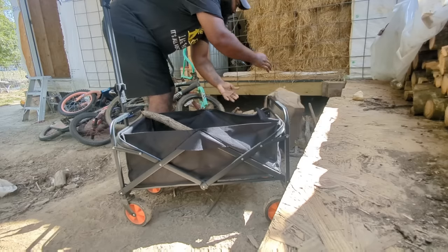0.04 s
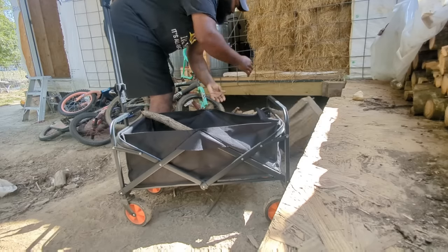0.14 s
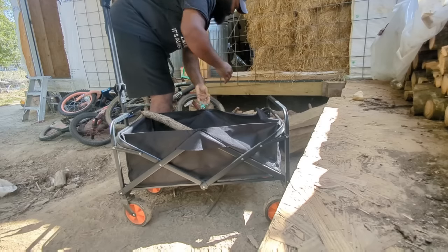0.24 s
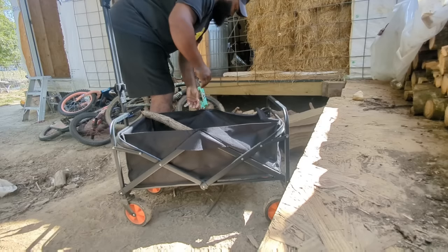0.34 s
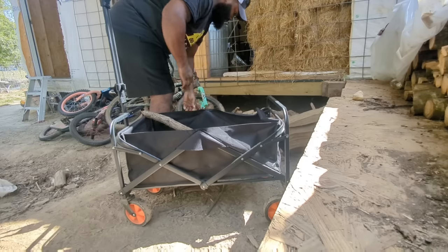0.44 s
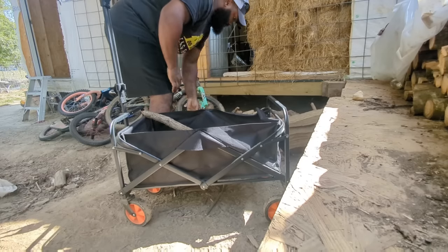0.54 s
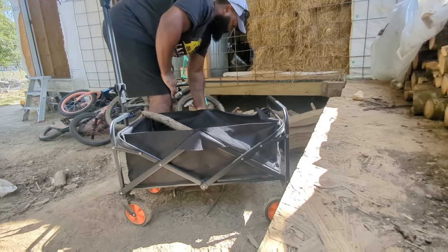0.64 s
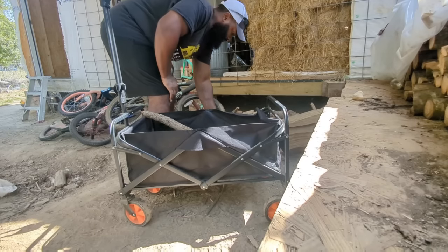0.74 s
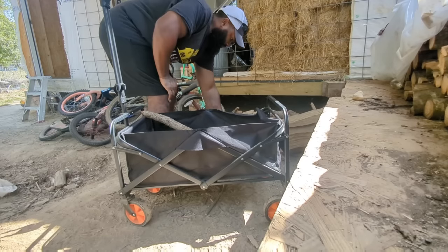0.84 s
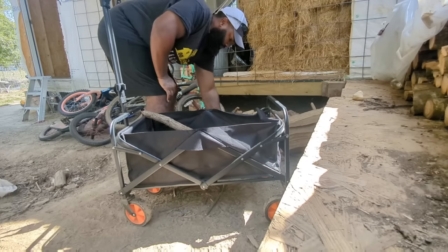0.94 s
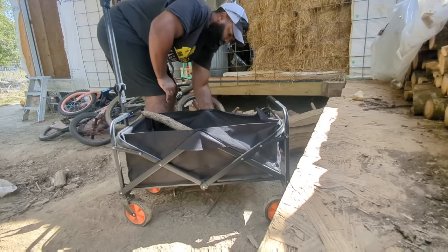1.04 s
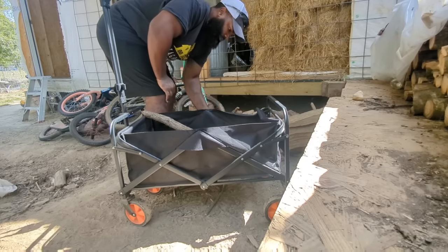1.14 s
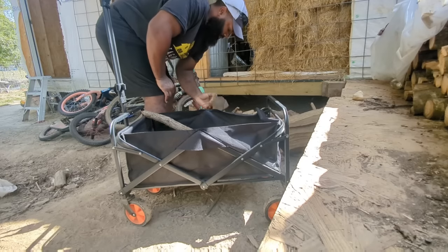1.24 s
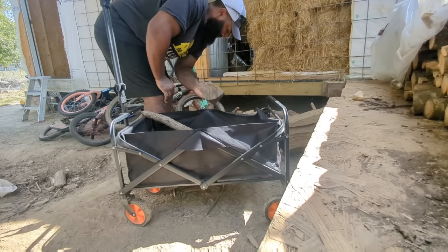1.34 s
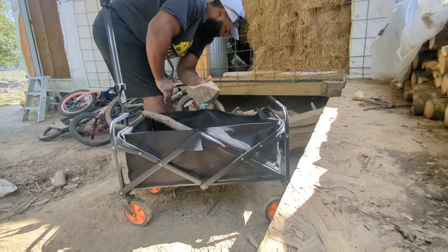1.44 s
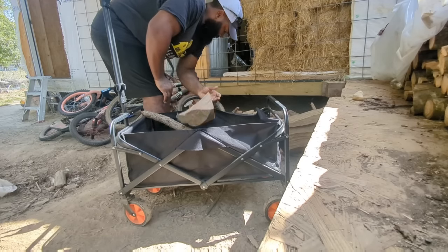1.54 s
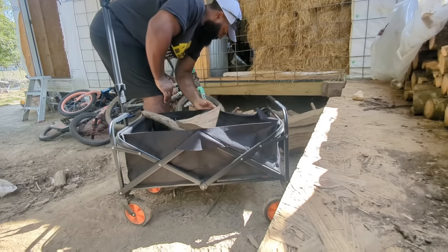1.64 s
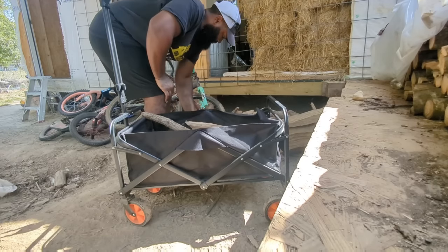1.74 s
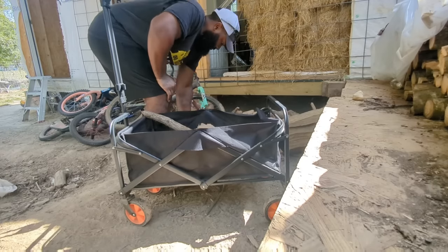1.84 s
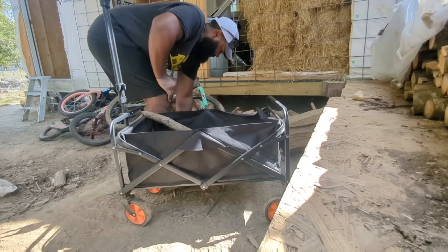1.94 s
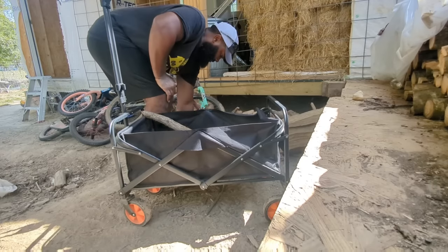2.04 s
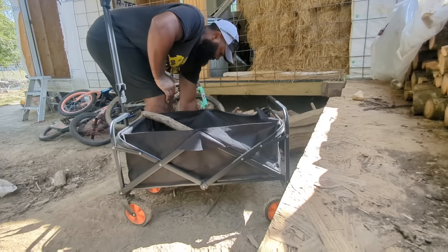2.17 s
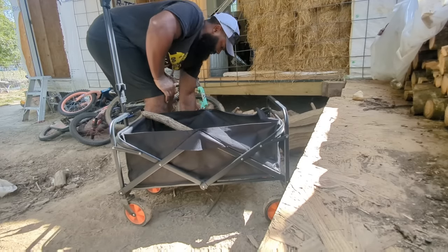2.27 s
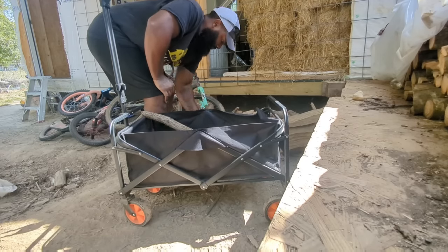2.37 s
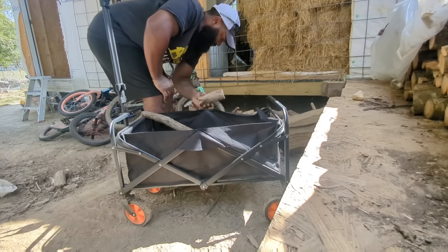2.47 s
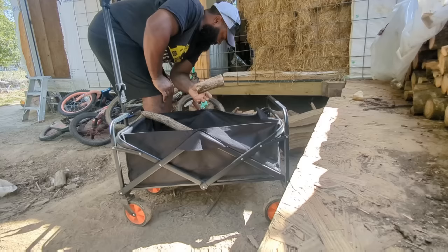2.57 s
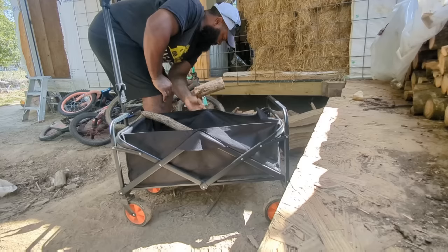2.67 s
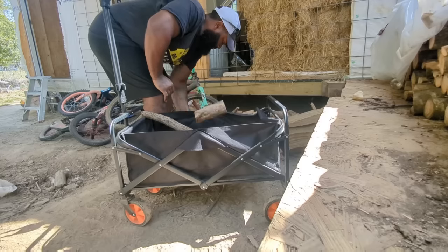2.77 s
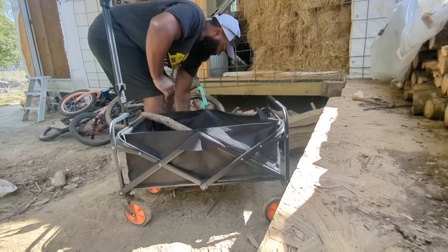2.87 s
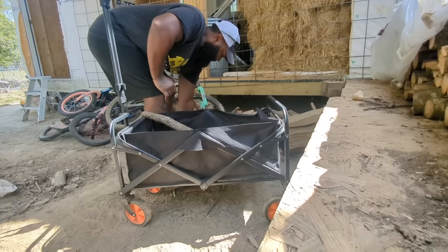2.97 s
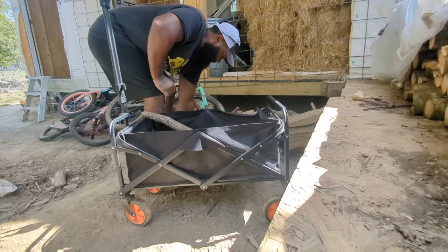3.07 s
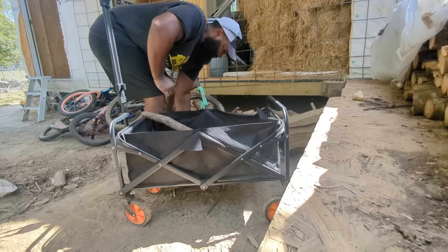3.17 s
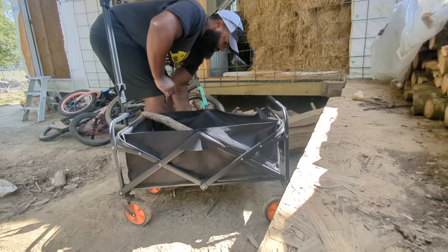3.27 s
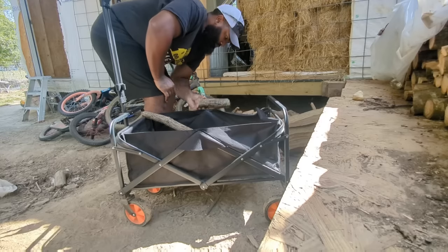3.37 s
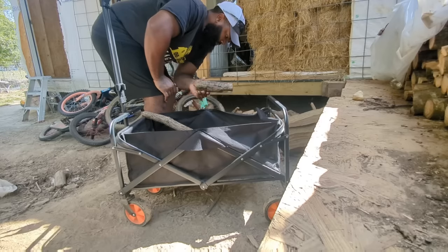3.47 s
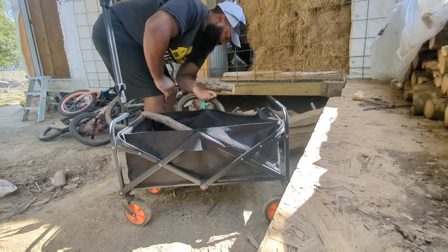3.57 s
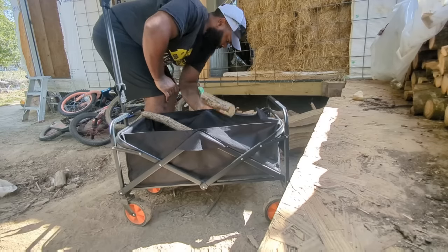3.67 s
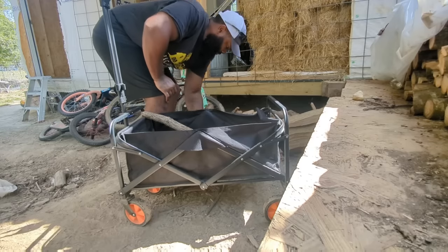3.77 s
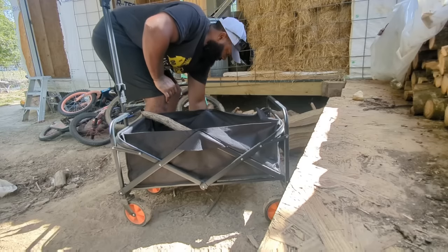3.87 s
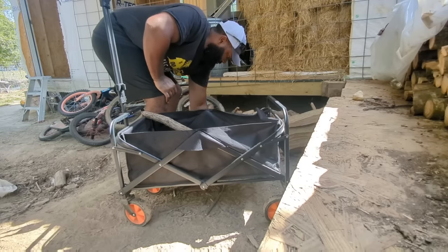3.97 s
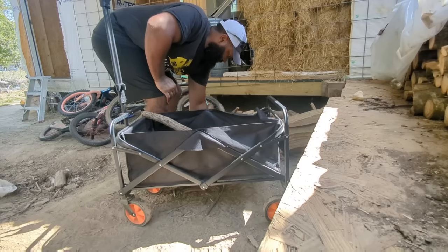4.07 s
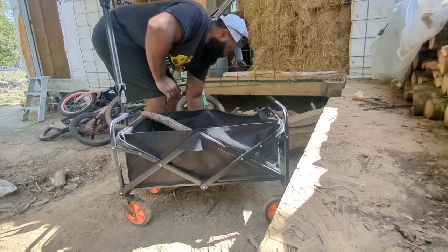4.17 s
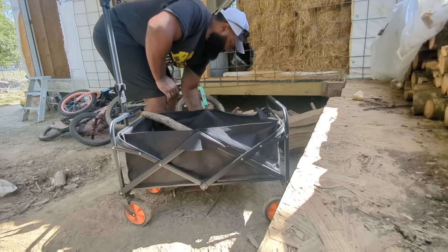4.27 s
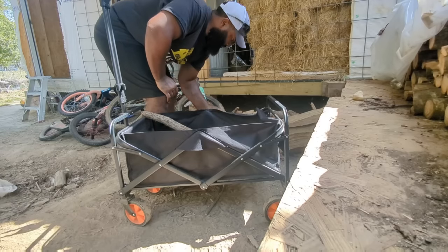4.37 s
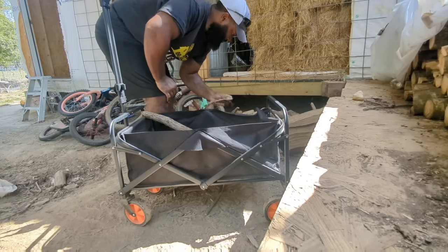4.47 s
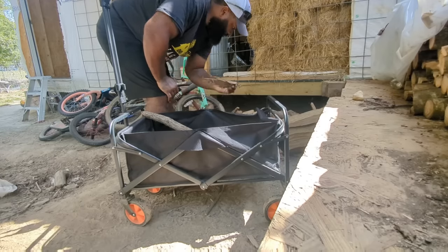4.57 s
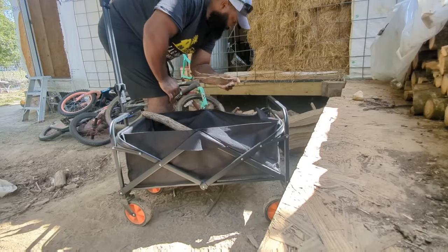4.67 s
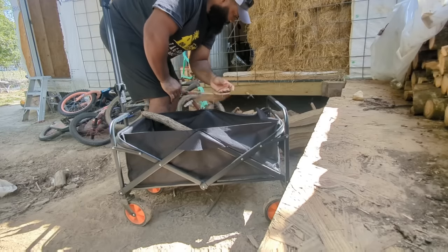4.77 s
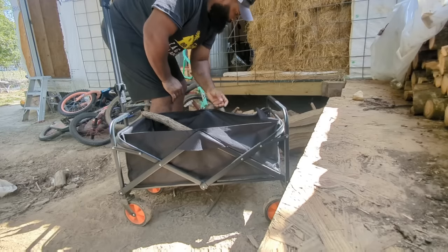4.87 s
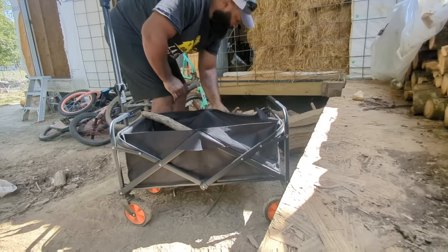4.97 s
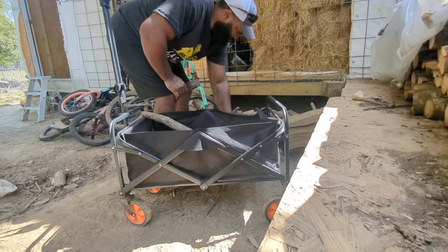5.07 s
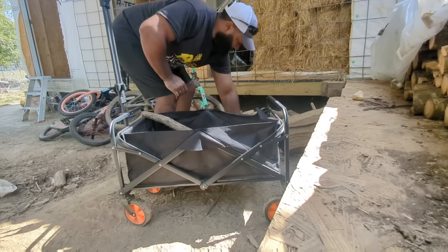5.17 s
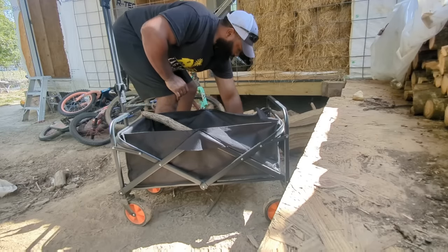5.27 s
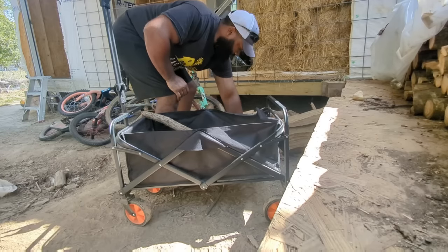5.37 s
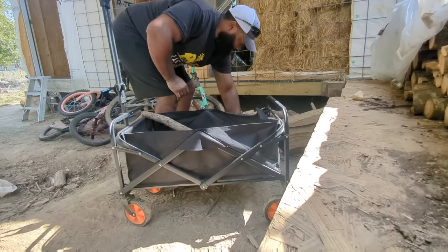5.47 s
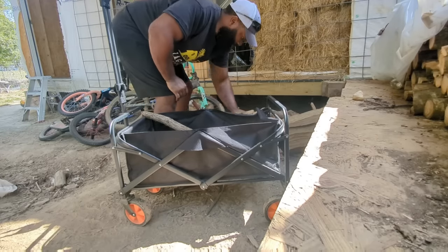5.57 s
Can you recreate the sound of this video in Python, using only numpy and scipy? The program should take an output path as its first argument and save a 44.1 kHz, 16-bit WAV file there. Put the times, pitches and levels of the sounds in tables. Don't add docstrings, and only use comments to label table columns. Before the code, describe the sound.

Firewood is handled close to a stereo handheld microphone outdoors, beside a shed. At 0.13 s a hard wooden double knock lands with a low thump and a steel tick; bark scrapes into a much louder crash at 0.4 s, crackling and slightly clipped, with a deep boom from the cloth bed. Faint shifting follows, with a small tap near 1.35 s. Knock clusters come at 1.7-1.9 and 2.0-2.1 s, clacking and thudding. Scraping fades until weaker knocks with bright frame jingles at 3.0 s, a snappier clack at 3.4 s, and a tumbling group at 3.9-4.15 s. Bark slides and light ticks run to 4.5 s. Dry knocks at 5.03-5.12 s hit wood with little bass, then soft scraping ends it. Underneath lie faint low traffic hum, very faint high falling chirps around 1.2-1.7 and 4.7-5.4 s, and a lower chirp near 3.8 s. Echoes are short.

```python
import sys
import numpy as np
from scipy import signal
from scipy.fft import rfft, irfft
from scipy.io import wavfile
from scipy.ndimage import uniform_filter1d

SR = 44100
rng = np.random.default_rng(int(sys.argv[2]) if len(sys.argv) > 2 else 0)


def nominal_scale(level):
    x = np.asarray(level, float) / 20
    return 10 ** x


def wav_record(signal):
    frames = np.transpose(np.atleast_2d(signal))
    bounded = np.clip(frames, -1, 1)
    quanta = np.round(bounded * 32767).astype(np.int16)
    wavfile.write(sys.argv[1], SR, quanta)


N = 247842


def evened(x):
    return x / np.sqrt(np.mean(x ** 2) + 1e-20)


def read(points, hz):
    f, value = np.transpose(points)
    return np.interp(np.log(hz + 1), np.log(f + 1), value)


def add(mix, s, sound):
    part = mix[..., round(s * SR):][..., :sound.shape[-1]]
    part += sound[..., :part.shape[-1]]


def coloured(x, points):
    n = x.shape[-1]
    return irfft(rfft(x) * nominal_scale(read(points, np.fft.rfftfreq(n, 1 / SR))), n)


def ring(x, modes):
    hz = np.fft.rfftfreq(len(x), 1 / SR)
    body = 0
    for k, (f, db, width_hz) in enumerate(modes):
        resonance = 1 / (1 + 1j * (hz ** 2 - f ** 2) / (width_hz * hz + 1e-9))
        body = body + (-1) ** k * nominal_scale(db) * resonance
    return irfft(rfft(x) * body, len(x))


def contacts(n, per_s, spread_db):
    size = nominal_scale(spread_db * np.minimum(rng.exponential(1, n), 3))
    return size * rng.standard_normal(n) * (rng.random(n) < per_s / SR)


def panned(x, pan_db):
    return x * nominal_scale([[pan_db / 2], [-pan_db / 2]])


# f/Hz, likeness/1
NEAR_LIKENESS = [(60, 0.9), (150, 0.9), (380, .75), (950, 0.7), (2400, 0.059), (6000, 0)]


def spaced(x, pan_db=0):
    n = len(x)
    same = read(NEAR_LIKENESS, np.fft.rfftfreq(n, 1 / SR))
    turn = rfft(rng.standard_normal(256) * np.exp(-np.arange(256) / 13.0), n)
    turn = turn / abs(turn)
    unlike = np.sqrt((1 - same) / 2) * turn * np.array([[1], [-1]])
    pair = irfft(rfft(x) * (np.sqrt((1 + same) / 2) + unlike), n)
    fade_out = np.minimum((n - np.arange(n)) / 1000, 1)
    return panned(pair * fade_out, pan_db)


# f/Hz, density/dB
BARK = [(150, -27.5), (300, -1), (550, -2.5), (1000, 1.5), (1800, 0), (2700, -2.5), (4000, -18.5),
        (6000, -26), (11000, -60)]
# f/Hz, density/dB
HISS_SPECTRUM = [(1760, -33.5), (3000, -5), (3800, -5.5), (4190, -9), (9020, -9), (13300, -18),
                 (15500, -38.5), (15900, -48.5)]


def rub(n):
    lumps = evened(uniform_filter1d(rng.standard_normal(n), 500))
    bark = evened(coloured(contacts(n, per_s=3000, spread_db=2), BARK))
    cloth = evened(coloured(contacts(n, per_s=5100, spread_db=3), HISS_SPECTRUM))
    return bark * nominal_scale(2.4 * lumps), cloth * nominal_scale(1.5 * lumps)


# t/s, bark level/dB
EFFORT = [(0, -54), (.07, -72), (.4, -36), (.55, -52.5), (.74, -85), (1.62, -79.5), (1.82, -56.5),
          (1.96, -70), (2.07, -49), (2.2, -66.5), (2.46, -94.5), (3.2, -71.5), (3.88, -80), (4.1, -46),
          (4.24, -75.5), (4.95, -89.5), (5.15, -55.5), (5.4, -80.5)]


def handling():
    s, effort_db = np.transpose(EFFORT)
    bark, cloth = rub(N)
    effort = nominal_scale(np.interp(np.arange(N) / SR, s, effort_db) - 4.5)
    return spaced(effort * (bark + nominal_scale(-11) * cloth))


# f/Hz, likeness/1
AIR_LIKENESS = [(60, 0.94), (150, 0.91), (380, 0.87), (950, -0.51), (2380, -0.99), (5980, 0.11),
                (15000, 0.46)]
# f/Hz, density/dB
AIR_SPECTRUM = [(20, -62), (30, -43), (42, -8.5), (60, -4), (100, -12.5), (200, -23), (400, -33.5),
                (1000, -42.5), (1800, -53), (3200, -61.5), (7200, -61.5), (8200, -55), (9300, -63.5),
                (15000, -66.5)]
# f/Hz, level/dB rms, width/Hz
ENGINES = [(57.9, -51, 19), (89.5, -70, 10), (138.2, -57.5, 4.6)]


def air():
    frames, hz = N // 512 + 5, np.fft.rfftfreq(2048, 1 / SR)
    a, b, c, d, patches = rng.standard_normal((frames, 1025, 5)).T
    patches = evened(uniform_filter1d(uniform_filter1d(patches, 12, 0), 8, 1))
    same = read(AIR_LIKENESS, hz)[:, None]
    left = a + 1j * b
    right = same * left + np.sqrt(1 - same ** 2) * (c + 1j * d)
    z = np.array([left, right]) * nominal_scale(read(AIR_SPECTRUM, hz)[:, None] + 1.1 * patches)
    wash = signal.istft(z, nperseg=2048, noverlap=1536)[1][:, :N]
    out = nominal_scale(-52.5) * evened(wash)
    for f, db, width_hz in ENGINES:
        mode = [(f, 0, width_hz)]
        out = out + nominal_scale(db) * evened(ring(ring(rng.standard_normal(N), mode), mode))
    return out


# f/Hz, t60/s
SHED_T60 = [(100, 0.41), (500, 0.2), (2000, 0.067), (8000, 0.053)]


def shed(x):
    taps = np.zeros((2, SR // 2))
    at = np.arange(300, SR // 2 - 20, 20) + rng.integers(0, 20, (2, (SR // 2 - 301) // 20))
    np.put_along_axis(taps, at, rng.choice([-1., 1.], at.shape), 1)
    hz, t, z = signal.stft(taps, SR, nperseg=256)
    z[:, hz < 100] = 0
    tail = signal.istft(z * nominal_scale(-60 * t / read(SHED_T60, hz)[:, None]), SR, nperseg=256)[1]
    x = signal.sosfilt(signal.butter(N=4, Wn=210, btype="high", fs=SR, output="sos"), x)
    return signal.fftconvolve(x, tail / np.linalg.norm(tail[0]), axes=1)[:, :N]


def slide(length_s, db, cloth_db, hz):
    n = 4096 * int(np.ceil(length_s * SR / 4096 + .3))
    bark, cloth = rub(n)
    width_hz = 140 + .7 * (hz / 1000) ** 5
    song = nominal_scale(-6) * evened(ring(bark, [(hz, 0, width_hz)]))
    u = np.clip(np.arange(n) / SR / length_s, 0, 1)
    stroke = np.sin(np.pi * u ** .5) ** 0.78
    return spaced(nominal_scale(db) * stroke * (bark + song + nominal_scale(cloth_db) * cloth))


# t/s, length/s, level/dB rms, cloth re bark/dB, log ring f/Hz
DRAGS = [(.02, 0.062, -66, 5.5, 1920), (.17, 0.14, -55, -2, 2500), (.312, 0.19, -47.5, -2, 2600),
         (.51, 0.053, -53, -3, 840), (3.23, .09, -74, -20, 1760), (.868, .03, -72, -18, 1200),
         (.965, 0.048, -71.5, 5.5, 2210), (1.075, 0.049, -71, -17.5, 1000), (1.254, .027, -72, -6.5, 3730),
         (1.42, .049, -65.5, -19, 550), (1.99, 0.11, -67, -17, 2200), (2.207, 0.087, -58, -8.5, 1550),
         (2.32, 0.043, -68.5, -8.5, 1680), (3.11, .12, -75.5, -10, 3080), (3.468, 0.067, -64.5, -15, 1505),
         (4.05, 0.34, -60.5, -9, 3500), (4.185, .079, -53.5, -32, 1590), (4.308, 0.14, -57.5, -2, 1780),
         (4.39, .069, -56, -4.5, 3570), (4.455, .1, -67.5, -2, 1700), (5.195, 0.1, -58.5, -7, 850),
         (5.36, 0.22, -72.5, -4.5, 4550), (5.55, 0.035, -71.5, 4, 1540), (5.59, 0.14, -66.5, 0.5, 993)]


def slides(mix):
    for s, *row in DRAGS:
        add(mix, s, slide(*row))


# ratio to main ring, level/dB, width/Hz
LOG_MODES = [(0.699, -14, 161.9), (0.999, 2.5, 91.27), (1.62, -5, 119.4), (2.45, -6.5, 150.2),
             (3.4, -18, 200), (4.698, -21.5, 260)]
KNOCK_T60_S = 0.082


def knock(db, hz, hiss_db, t60_s, pan_db):
    t = np.arange(8192) / SR
    fade = (1 - np.exp(-t / 0.0012)) * nominal_scale(-60 * t / t60_s) * (t < .15)
    shifts = [1, 1, *rng.uniform(.88, 1.12, len(LOG_MODES) - 2)]
    modes = []
    for (ratio, mode_db, width_hz), shift in zip(LOG_MODES, shifts):
        soft_db = 10 * np.log10(1 + (hz * ratio / 2100.0) ** 6)
        modes.append((hz * ratio * shift, mode_db - soft_db, width_hz))
    hits = evened(contacts(len(t), per_s=4000, spread_db=1.0))
    hits[40] = 3.
    wood = ring(hits * fade, modes) + nominal_scale(-14.5) * coloured(hits * fade, BARK)
    splinters = contacts(len(t), per_s=13000, spread_db=2.0)
    hiss = evened(coloured(splinters, HISS_SPECTRUM)) * fade ** 0.55
    return spaced(nominal_scale(db) * (wood / abs(wood).max() + nominal_scale(hiss_db - 3.0) * hiss), pan_db)


# f/Hz, level/dB, width/Hz
HEAP_MODES = [(134, -3, 43), (200, -2.5, 19), (270, 0.5, 44), (361, -2, 37), (460, -6.5, 60)]


def load(s, db):
    t = np.arange(6144) / SR
    jolts = contacts(len(t), per_s=530, spread_db=2) * nominal_scale(-60 * t / (1.5 * KNOCK_T60_S))
    jolts[60] = 0.93
    shifts = 1 + .15 * rng.uniform(-1, 1, len(HEAP_MODES))
    heap = ring(jolts, [(hz * k, d, w) for (hz, d, w), k in zip(HEAP_MODES, shifts)])
    pile_db = -4 if s > 4.9 else 0
    return spaced(nominal_scale(db - 11.5 + pile_db) * heap / abs(heap).max(), pan_db=-1.5)


# t/s, level/dB peak, ring f/Hz, hiss re peak/dB, slap re touch/dB
BLOWS = [(.128, -14.5, 1396, -20, -4), (0.142, -14.5, 455, -21.5, -12.5), (.313, -26.5, 544, -20.5, -1),
         (0.395, -11, 1017, -17.5, 2.5), (.412, -15.5, 622, -11.5, -25), (1.711, -31, 1176, -7.5, 5.5),
         (1.742, -27, 492, -12.5, -5), (1.759, -33, 920, -31, 0), (1.869, -35, 926, -26, -15),
         (1.875, -27.5, 1114, -19, 1.5), (2.021, -22.5, 1520, -34, 2), (2.04, -24.5, 437, -18, -10.5),
         (2.077, -30.5, 890, -21, 0), (2.993, -34, 517, -7, 5.5), (3.011, -33, 1010, -17, -6),
         (3.06, -37, 1110, -3.5, -12), (3.37, -28.5, 1460, -18.5, 7.5), (3.387, -29.5, 440, -17.5, -9),
         (3.9, -22.5, 582, -19, -7), (3.933, -24.5, 500, -16.5, -9), (3.975, -19.5, 990, -18, -2),
         (4.104, -30, 935, -24, -4), (5.033, -23, 560, -13, -5), (5.089, -22.5, 917, -15.5, -8)]


def knocks(mix):
    slap_after_s, slap_hz = .0085, 560
    for s, db, hz, hiss_db, slap_db in BLOWS:
        t60_s = KNOCK_T60_S * np.exp(-0.0456 * max(db + 26, 0))
        add(mix, s, knock(db, hz, hiss_db, t60_s, pan_db=-2))
        add(mix, s + slap_after_s, knock(db + slap_db, slap_hz, hiss_db, t60_s, pan_db=0.53))
        add(mix, s, load(s, db))


def thump(db, hz, t60_s, rise_per_s=0):
    t = np.arange(min(16384, round(1.3 * t60_s * SR))) / SR
    swing = np.sin(2 * np.pi * hz * (t + rise_per_s * t ** 2 / 2))
    onset = 1 - np.exp(-t * hz * 17.0)
    return nominal_scale(db - 60 * (t / t60_s) ** 1.383) * onset * swing


# t/s, level/dB peak, f/Hz, t60/s
RINGS_AND_SNAP = [(.129, -25, 2185, .03), (.133, -25.5, 1005, 0.018), (2.02, -33, 1574, .05),
                  (5.094, -37, 2190, .03), (0.4137, -10, 2700, 0.0036), (0.4119, -18.5, 6000, 0.0042),
                  (.972, -61.5, 2210, 0.056), (.764, -54, 575, .05), (1.12, -52, 420, .04),
                  (1.347, -42, 1010, .03), (1.352, -47, 1560, .03), (1.352, -50, 2650, .03),
                  (4.108, -34, 1680, .04), (3.903, -30, 620, .03), (2.083, -33, 880, .04),
                  (1.728, -29, 275, .11), (1.879, -32, 287, .07), (.352, -41, 2610, .1),
                  (2.088, -32, 365, .06), (1.711, -37, 5220, 0.052), (3.002, -41.5, 7910, 0.021),
                  (3.061, -54, 1037, 0.047), (3.382, -23.5, 1535, 0.018), (3.422, -45, 2527, 0.051),
                  (3.901, -38.5, 8140, 0.021), (4.096, -32, 1530, 0.015), (4.187, -41.5, 1548, .06),
                  (5.043, -27, 1457, 0.028), (5.045, -31, 875, 0.04), (5.101, -28, 1770, 0.035),
                  (5.091, -28, 1500, .03), (5.091, -29, 620, .02), (5.037, -31, 1850, .02),
                  (3.378, -27, 560, .025), (.129, -22, 1200, .03), (.143, -21, 480, .035),
                  (.15, -27, 950, .05), (5.12, -37, 1780, .05), (5.04, -29, 560, .05), (5.057, -32, 560, .03),
                  (3.909, -30, 950, .03), (4.225, -47, 1520, .025), (2.052, -33, 900, .03)]


def pings(mix):
    for s, *row in RINGS_AND_SNAP:
        add(mix, s, spaced(np.pad(thump(*row), (0, 1500))))


# t/s, level/dB peak, f/Hz, t60/s
BED_THUMPS = [(.131, -21.5, 540, 0.038), (.139, -23, 150, .05), (.151, -10, 79.4, .07),
              (.194, -26, 75, .06), (.21, -24, 78, .07), (.235, -31, 62, .2), (.268, -29, 70, .08),
              (.399, -5, 184, 0.066), (.4, -15, 350, 0.035), (.411, -11, 195, .04), (.428, -21, 250, .05),
              (.462, -24, 160, .1), (.518, -27, 90, .1), (.414, -2.5, 72, .21), (0.443, -8, 108, 0.1),
              (.545, -30.5, 70.8, 0.48), (.76, -38.5, 61.8, 0.44), (1.345, -35.5, 335, 0.052),
              (1.714, -29, 85, .08), (1.723, -29, 166.7, 0.083), (1.778, -30, 125, .06),
              (1.878, -31, 110, .05), (1.75, -25, 71.6, .096), (1.884, -25.5, 189.7, 0.037),
              (1.896, -26, 76.7, 0.082), (2.022, -28, 150, .04), (2.029, -26, 338, 0.026),
              (2.039, -24, 68, 0.09), (2.102, -31, 225, .05), (2.126, -34, 75, .1),
              (2.085, -22, 188.3, .07),
              (3.004, -29, 148, .11), (3.007, -28, 258.6, 0.038), (3.015, -27, 75, 0.08),
               (3.372, -27, 300, .03), (3.385, -17, 342, 0.022), (3.388, -27.5, 200, 0.095),
               (3.381, -28, 100, .05), (3.396, -24, 170, 0.04), (3.417, -28, 90, .06),
               (3.432, -33, 230, .08), (3.902, -31, 300, .05), (3.915, -27.5, 69, 0.12),
               (3.95, -25.5, 216, .051), (3.976, -28, 302, 0.05), (3.977, -23.5, 222, .09),
               (3.979, -30, 75, .05), (4.008, -30, 280, .06), (4.014, -30, 80, .09), (4.045, -35, 220, .05),
               (4.118, -31, 115, .05), (4.124, -33.5, 243, .1), (4.13, -24.5, 88, .06),
               (4.158, -33, 80, .12)]


def thumps(mix):
    for s, db, hz, t60_s in BED_THUMPS:
        is_cloth = hz < 120
        rise_per_s = 3.6 * np.sqrt(nominal_scale(db)) * is_cloth
        pair = panned(thump(db, hz, t60_s, rise_per_s), pan_db=-2.6 if is_cloth else 0.2)
        lead_s = .0003 * min(max(hz / 190 - 1, 0), 1)
        add(mix[0], s, pair[0])
        add(mix[1], s + lead_s, pair[1])


# f/Hz, level/dB, damping time/s (a shorter one widens the mode a little)
FRAME_MODES = [(5220, -14.5, 0.36), (6430, -13.5, 5.0), (6466, -4, 0.15), (8080, -31, 0.22),
               (8370, -13, 0.37), (8830, -5.5, 0.43), (10350, -18.5, 0.3), (10810, -15.5, 0.24),
               (11935, -12.5, 0.28)]


def jingle(db, t60_s):
    t = np.arange(8192) / SR
    ticks = contacts(len(t), per_s=4300, spread_db=1.5) * nominal_scale(-60 * t / t60_s) * (t < .12)
    ticks[4] = 2.9
    modes = []
    for (f, mode_db, decay_s), z in zip(FRAME_MODES, rng.standard_normal(len(FRAME_MODES))):
        modes.append((f, mode_db + 2.7 * z, 330 + 1.6 / decay_s))
    steel = ring(ticks, modes)
    return spaced(nominal_scale(db + 0.5) * steel / abs(steel).max(), pan_db=-5)


# t/s, level/dB peak, shaking t60/s
SHAKES = [(0.1343, -31.5, 0.057), (1.756, -40, 0.08), (3.0027, -35.5, 0.052), (3.0609, -31.5, 0.058),
          (3.0734, -42, 0.049), (3.3962, -28.5, 0.057), (3.4164, -35.5, 0.078), (3.9848, -44.5, 0.16),
          (3.9924, -30, 0.089), (4.1184, -39.5, 0.07), (5.0399, -38.5, 0.0476)]


def jingles(mix):
    for s, *row in SHAKES:
        add(mix, s, jingle(*row))


# t/s, level/dB peak, ring f/Hz, hiss re peak/dB
LIGHT_CONTACTS = [(.159, -24.5, 554, -31), (.516, -44.5, 530, -16.5), (0.763, -52, 557, -39.5),
                  (1.116, -51.5, 462, -27), (1.258, -55, 498, -15), (1.345, -36.5, 555, -42),
                  (1.359, -44, 504, -36), (3.405, -35.5, 605, -10), (3.472, -45, 1480, -13.5),
                  (3.949, -31, 563, -18), (4.094, -47.5, 1550, -32), (4.119, -28, 650, -20),
                  (4.231, -44.5, 950, -21), (4.459, -48, 1700, -9.5), (5.058, -29.5, 560, -40),
                  (5.102, -29, 1710, -26), (5.066, -33, 1000, -20), (5.077, -37, 1050, -20),
                  (5.117, -36, 1750, -25), (4.009, -33, 600, -25), (4.026, -37, 540, -25),
                  (4.136, -36, 720, -25), (4.334, -47, 1800, -12), (4.346, -45, 1750, -12),
                  (4.408, -47, 1600, -12), (2.058, -33, 900, -25), (2.068, -35, 1200, -25),
                  (2.112, -37, 650, -30), (.321, -33, 650, -20), (.345, -34, 1000, -20),
                  (.368, -34, 950, -20), (1.721, -34, 1000, -20), (1.787, -40, 600, -25)]


def taps(mix):
    for s, db, hz, hiss_db in LIGHT_CONTACTS:
        add(mix, s, knock(db, hz, hiss_db, .75 * KNOCK_T60_S, pan_db=1))
        add(mix, s, load(s, db))


def chirp(length_s, start_hz, end_hz, db):
    u = np.arange(round(length_s * SR)) / (length_s * SR)
    scoop_hz = 500 * np.exp(-u * length_s / .005)
    turns = np.cumsum(start_hz + (end_hz - start_hz) * u ** 1.9 - scoop_hz) / SR
    waver = uniform_filter1d(uniform_filter1d(rng.standard_normal(len(u)), 200), 200)
    tone = np.sin(2 * np.pi * turns)
    mirror_hz = 16000
    if start_hz > mirror_hz / 3:
        leak = .8 / (1 + ((start_hz + (end_hz - start_hz) * u ** 1.9 - scoop_hz - mirror_hz / 2) / 450) ** 2)
        tone += leak * np.sin(2 * np.pi * (mirror_hz * u * length_s - turns))
    tone *= (1 + .7 * evened(waver)) * np.sin(np.pi * u ** 1.4) ** .6
    echoes = rng.standard_normal(6000) * nominal_scale(-33 - 60 * np.arange(6000) / SR / .18)
    echoes[0] = 1
    return nominal_scale(db + 6.) * signal.fftconvolve(tone, echoes)


# t/s, length/s, start f/Hz, end f/Hz, level/dB rms
BIRD_CALLS = [
    (1.15, .11, 8590, 7060, -79),
    (1.345, 0.086, 8370, 7100, -76.5),
    (1.581, .105, 8950, 7000, -80.5),
    (4.734, 0.074, 8650, 7070, -79.5),
    (5.136, 0.051, 8120, 7280, -75),
    (5.296, .08, 8316, 7100, -78.5),
    (3.786, .042, 2850, 2150, -65.5),
]


def birds():
    calls = np.zeros(N)
    for s, *row in BIRD_CALLS:
        add(calls, s, chirp(*row))
    return spaced(calls)


def scene():
    near = handling()
    for source in slides, knocks, pings, thumps, jingles, taps:
        source(near)
    return near + birds() + nominal_scale(-15.5) * shed(near) + air()


def low_pass(x):
    return signal.sosfilt(signal.butter(12, 16010, fs=SR, output="sos"), x)


def record(dry):
    cut = signal.sosfilt(signal.butter(N=4, Wn=40., btype="high", fs=SR, output="sos"), dry)
    edge = signal.firwin(301, 15400, window=("kaiser", 8), fs=SR)
    limited = signal.oaconvolve(np.clip(cut, -1, 1), edge[None], "same")
    mix = np.clip(limited, -1, 1)
    return low_pass(mix)


dry = scene()
out = record(dry)
wav_record(out)
```